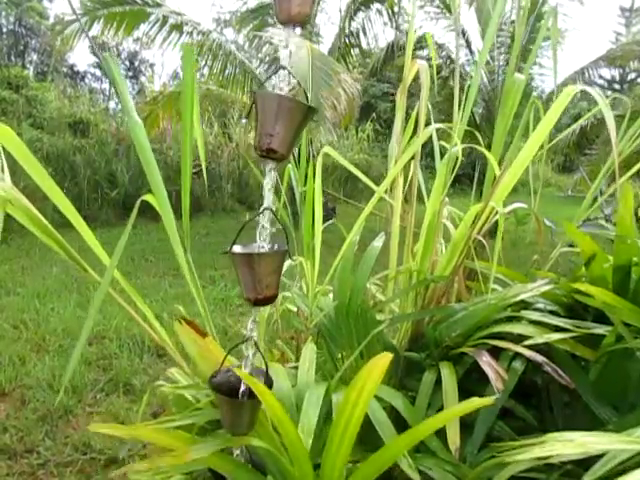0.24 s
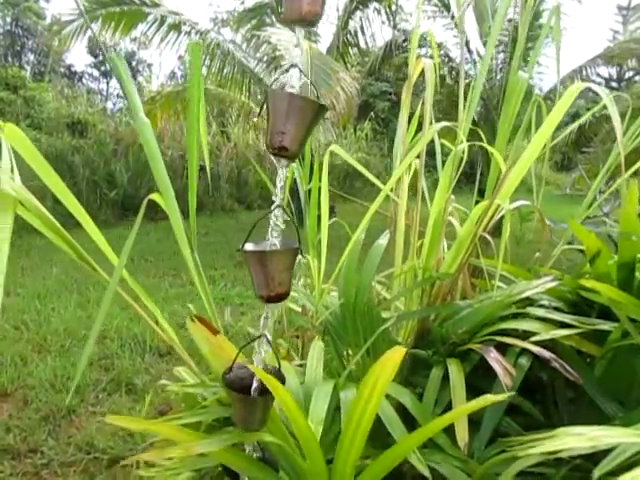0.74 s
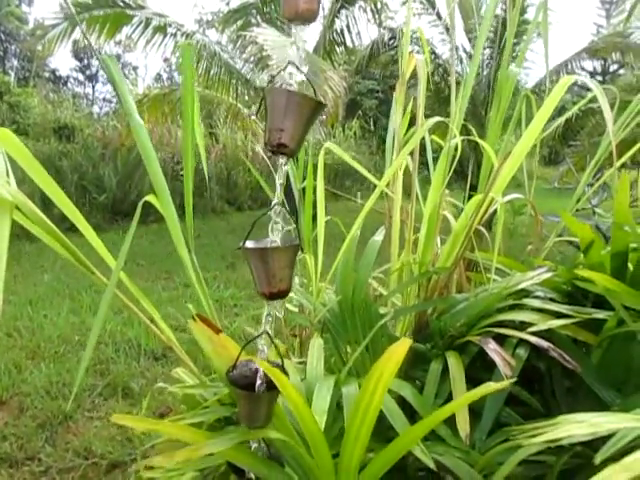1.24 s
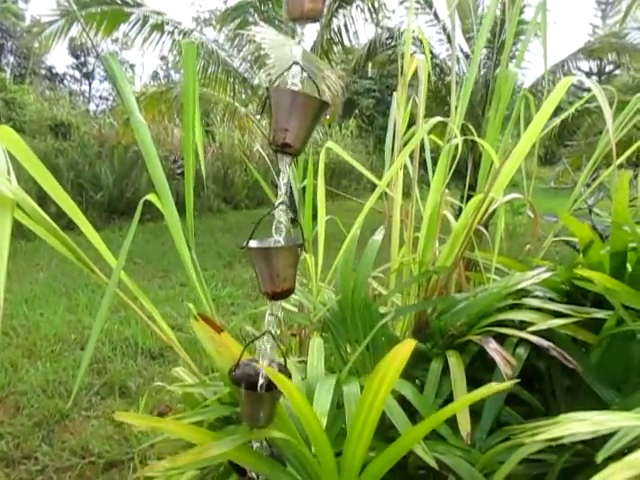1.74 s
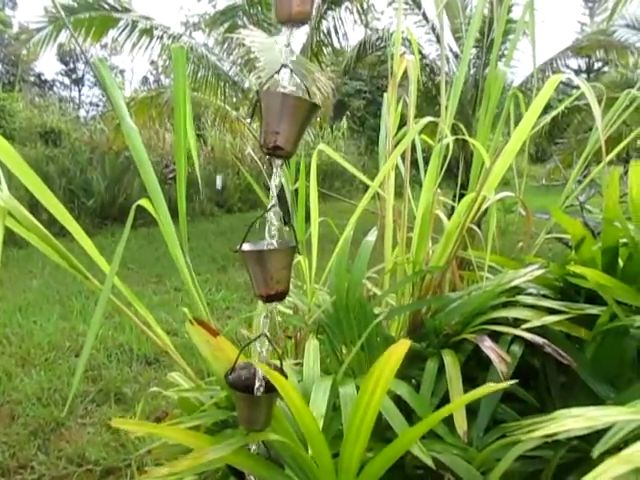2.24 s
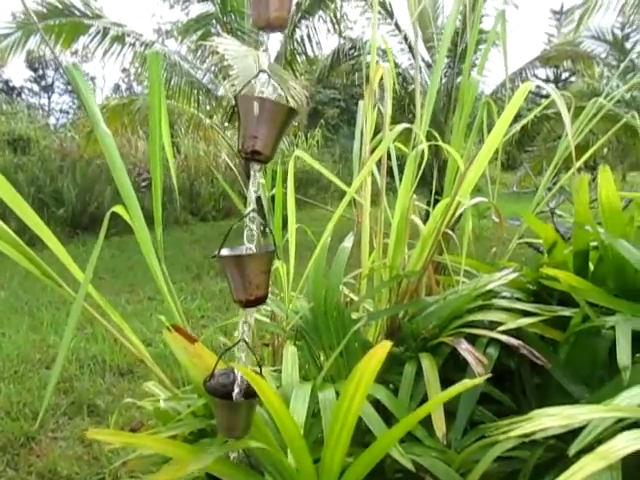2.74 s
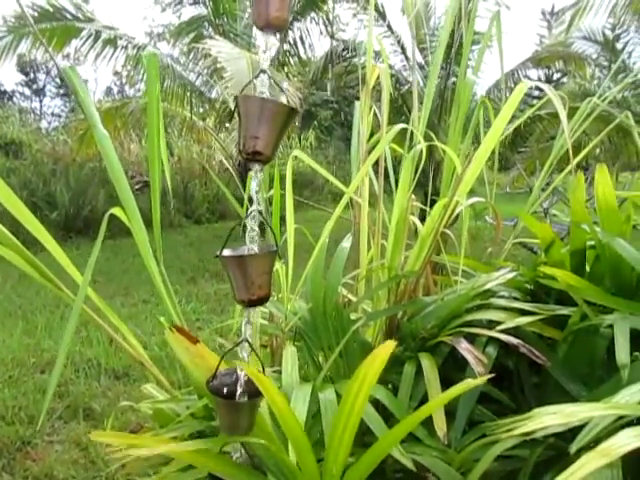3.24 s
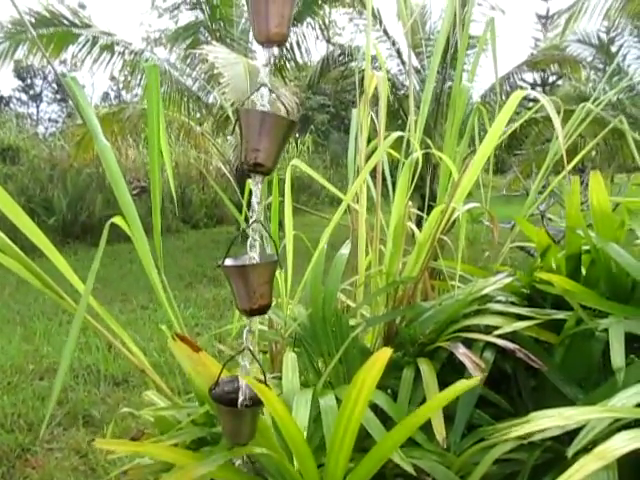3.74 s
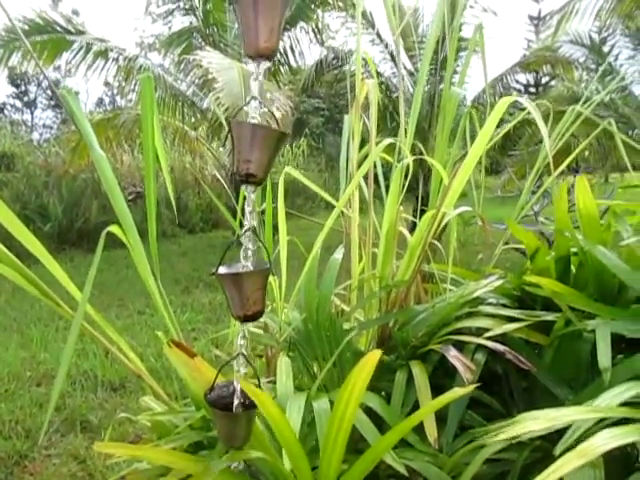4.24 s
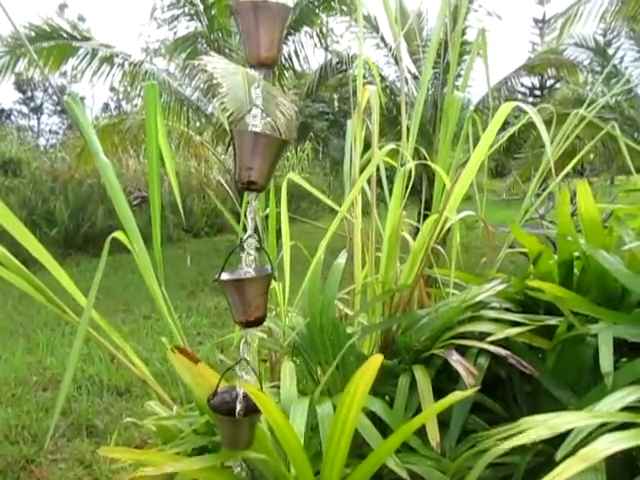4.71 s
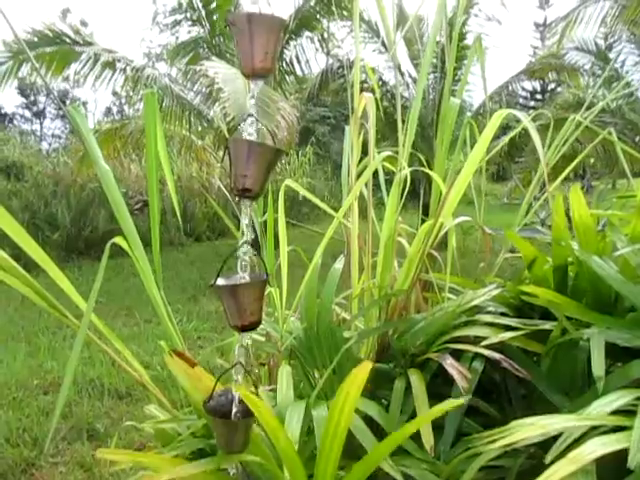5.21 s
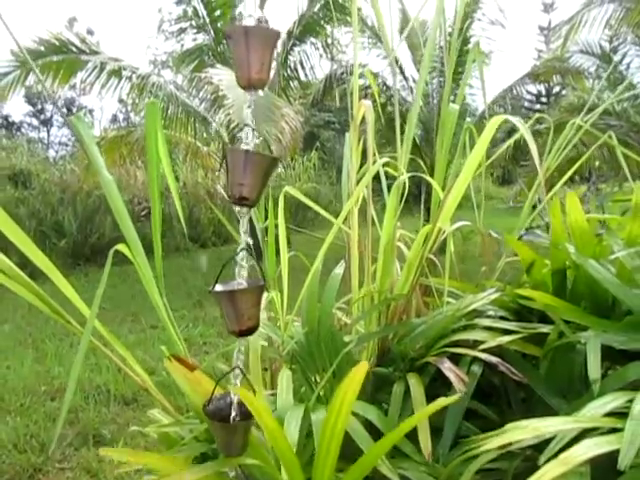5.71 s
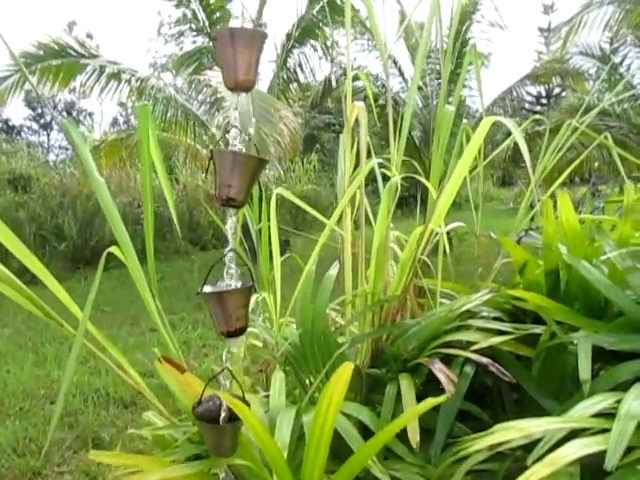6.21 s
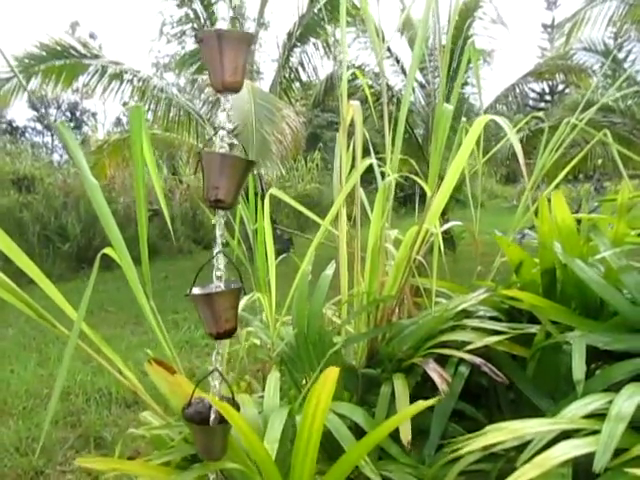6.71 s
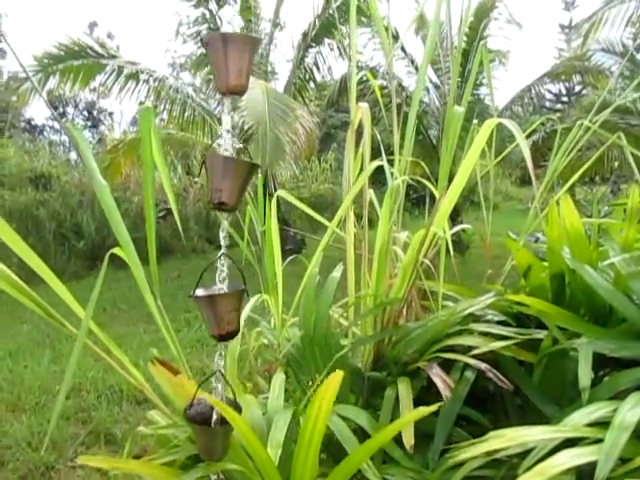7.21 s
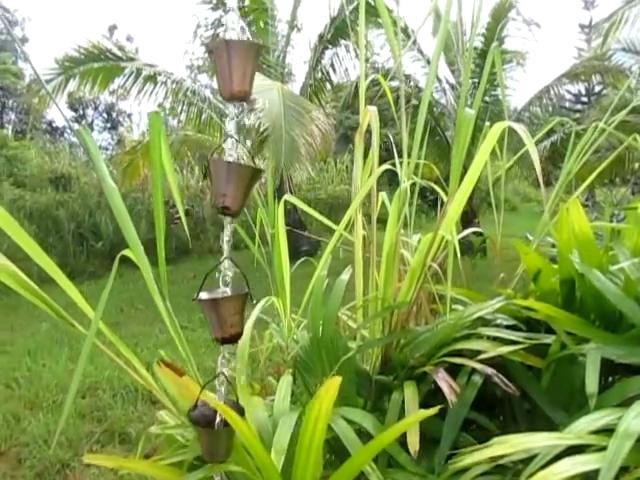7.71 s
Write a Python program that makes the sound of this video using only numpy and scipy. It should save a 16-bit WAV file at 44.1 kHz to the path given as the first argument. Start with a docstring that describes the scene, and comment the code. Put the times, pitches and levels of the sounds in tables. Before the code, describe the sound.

A steady, crisp splatter of falling water, with drops slapping leaves and soil and ticking lightly on thin metal cups outdoors.

```python
"""Water runs down a chain of hanging metal cups in a garden and breaks up on the plants below.
Spray is banded noise that random drops flare up; slugs of water slap on leaves and soil as noise bursts.
Drops tick on the cup walls and set resonators ringing; droplets crackle, trapped bubbles plink as rising sines.
Dull air noise lies behind, with the wavering hum of a distant machine; two microphone ports hear it all."""
import sys
import numpy as np
from scipy import signal
from scipy.fft import rfft, irfft
from scipy.io import wavfile

SR = 44100
rng = np.random.default_rng(int(sys.argv[2]) if len(sys.argv) > 2 else 0)


def file_out(sig):
    """Save sig as 16-bit WAV at sys.argv[1]."""
    # one column per channel
    cols = np.atleast_2d(sig).T
    # limit, then scale
    lim = np.clip(cols, -1, 1)
    pcm = np.round(lim * 32767).astype(np.int16)
    wavfile.write(sys.argv[1], SR, pcm)


N = 351036

# Ringing modes of the cup walls. Each row: nominal pitch in Hz, level in dB, time to fade by 60 dB in seconds.
CUP_MODES = [(5540, -5, 0.036), (8660, -3, 0.04), (10300, -4, 0.025)]
CUP_SPREAD = 0.0078   # detuning from cup to cup, as a share of the pitch


def amp(db):
    """Decibels to a linear factor."""
    return 10 ** (np.asarray(db) / 20)


def rms_one(x):
    """Scale to an overall RMS of 1."""
    return x / np.sqrt(np.mean(x ** 2) + 1e-20)


def peak_one(x):
    """Scale so that the shared part (first row) peaks at 1."""
    return x / abs(x[0]).max()


def at_hz(points, hz):
    """Read a curve joined by straight lines over log frequency."""
    points = np.array(points)
    return np.interp(np.log(hz), np.log(points[:, 0]), points[:, 1])


def in_time(rows):
    """A curve joined by straight lines, one value a sample."""
    return np.interp(np.arange(N) / SR, *np.transpose(rows))


def drift(corner_hz):
    """Slow random wander of RMS 1: noise at every 40th sample through two equal one-pole low-passes."""
    r = np.exp(-80 * np.pi * corner_hz / SR)
    noise = rng.standard_normal(N // 40 + 2002)
    slow = signal.lfilter([1], [1, -2 * r, r * r], noise)[2000:]   # the filter has settled by here
    return np.interp(np.arange(N) / 40, np.arange(len(slow)), rms_one(slow))


def band(x, low_hz, high_hz, order):
    """Butterworth band-pass."""
    return signal.sosfilt(signal.butter(order, [low_hz, high_hz], "band", fs=SR, output="sos"), x)


def ring(clicks, hz, t60):
    """Two-pole resonator: a unit click sets a sine of about height 1 ringing, 60 dB down after t60 seconds."""
    r, w = amp(-60 / (t60 * SR)), 2 * np.pi * hz / SR
    return signal.lfilter([0, np.sin(w)], [1, -2 * r * np.cos(w), r * r], clicks + 1e-18)


def pair(common, apart, hz, extra=0):
    """Left and right from a shared and an opposed part, as alike as that pitch is heard."""
    # Likeness of the two sides. Each row: frequency in Hz, left-right correlation from -1 to 1.
    likeness = [(60, .68), (130, -1), (290, 0.34), (640, 0.58), (1410, 0.6), (3100, 0.49), (6820, -0.074),
                (15000, 0.97)]
    alike = np.clip(at_hz(likeness, hz) + extra, -.95, .98)
    return np.sqrt(1 + alike) * common + np.sqrt(1 - alike) * apart * [[1], [-1]]


def add(out, s, sound):
    """Mix a sound in at s seconds, cut off at the end of the scene."""
    i = round(s * SR)
    out[:, i:i + sound.shape[1]] += sound[:, :N - i]


def spray(low_db, high_db, per_s, spread_db, reach_oct, patter_db, snap_db, t60):
    """Fifth-octave noise; random drops, each covering an octave or so, snap and flare up over a smooth hiss."""
    # Colour of the spray, relative within each half. Each row: frequency in Hz, density in dB per Hz.
    colour = [(88, -38), (150, -15), (309, -5.5), (534, -7.5), (1480, -2.5), (1980, -6.5), (3350, 2),
              (7770, 1.5), (8730, 5), (10600, 3.5), (12500, 3.5), (14200, -9.5), (16000, -1.5)]
    edges = 150 * 2 ** np.arange(0, 7, 1 / 5)
    count = int(per_s * N / SR)
    at = rng.integers(0, N, count)
    size = amp(spread_db * np.minimum(rng.exponential(1, count), 2.4))
    centre = rng.uniform(np.log2(250), np.log2(20000), count)
    reach = reach_oct * amp(2.0 * rng.standard_normal(count))   # some drops are narrower than others
    facing = rng.standard_normal((2, N))   # each snap comes from its own side
    gaps = amp(2 * drift(15))   # the stream breaks up in all bands at once
    white = rng.standard_normal((2, 2, N))
    halves = [0, 0]   # bands centred below and above 3 kHz
    for k, (low, high) in enumerate(zip(edges, edges[1:])):
        hz = np.sqrt(low * high)
        overlap = np.exp(-.5 * ((np.log2(hz) - centre) / reach) ** 2)
        hits = np.bincount(at, size * overlap, N)
        fade = amp(-60 / (SR * (t60 + 6.8 / hz)))   # low drops last longer
        flare = rms_one(signal.lfilter([1], [1, -fade], hits))
        hiss = gaps * amp(2.5 * drift(16.6))
        water = white[k % 2] * (hiss + amp(patter_db) * flare)
        water += amp(snap_db) * rms_one(hits) * facing
        halves[hz > 3000] += amp(at_hz(colour, hz)) * pair(*band(water, low, high, order=2), hz)
    return amp(low_db) * rms_one(halves[0]) + amp(high_db) * rms_one(halves[1])


def crackle(swing_db):
    """Lone droplets snap on leaves: a few milliseconds of fizz, each in one of five colours."""
    per_s, level_db, t60 = 220, -43, 0.0042   # droplets a second in all colours; dB; seconds
    out = 0
    for hz in (1730, 3240, 5070, 8500, 11200):
        size = amp(4.2 * np.minimum(rng.exponential(1, N), 2.5))
        born = (rng.random(N) < per_s / 5 / SR) * size
        fizz = signal.lfilter([1], [1, -amp(-60 / (t60 * SR))], born) * rng.standard_normal((2, N))
        out = out + pair(*band(fizz, hz / 1.38, hz * 1.23, order=1), hz)
    return amp(level_db + swing_db) * out


def plink(hz, cycles, rise):
    """Trapped air rings briefly and climbs in pitch as it nears the surface, where it bursts."""
    burst_ratio = 2.2   # it has fallen silent once its pitch has climbed this far
    turns = hz * np.arange(SR // 30) / SR
    climb = rise * turns / cycles   # the phase gains this share, so the pitch gains twice as much
    fade = amp(-60 * turns / cycles)
    burst = np.clip(8 * (burst_ratio - 1 - 2 * climb), 0, 1)
    return np.sin(2 * np.pi * turns * (1 + climb)) * fade * burst


def bubbles(per_s, level_db, cycles, rise):
    """Many faint short bubbles at random, a few clear ones, all sines of trapped air."""
    # Single drops that trap a bubble. Each row: start in seconds, level in dB, start pitch in Hz,
    # cycles to fade by 60 dB, half the rise in pitch over those cycles as a share of the start pitch.
    clear_ones = [(0.557, -35.5, 2130, 423, 8.7), (3.166, -29.5, 4580, 58, .15),
                  (3.196, -29.5, 1240, 12, 0.54), (4.605, -36.5, 3100, 71, 0.23),
                  (4.651, -34, 3030, 127, 0.22), (4.687, -34, 3700, 77, .2), (5.215, -34, 2170, 51, 0.045),
                  (7.238, -25.5, 4100, 27.5, 0.1), (7.469, -33.5, 3600, 95, 0.55)]
    out = np.zeros((2, N))
    for when, pitch, loud, side in rng.random((int(per_s * N / SR), 4)):
        sides = amp([[3.2 * (side - .5)], [5.6 * (.5 - side)]])
        level = amp(level_db - 23.3 * np.sqrt(loud))
        add(out, when * N / SR, level * sides * plink(800 * 2 ** (3.8 * pitch), cycles, rise))
    for s, db, hz, turns, climb in clear_ones:
        add(out, s, amp(db) * plink(hz, turns, climb) * [[1], [1]])
    return out


def pings(per_s, level_db):
    """Stray droplets ring one wall mode or another, on cups tuned slightly apart; per_s counts for each."""
    out = 0
    for hz, db, t60 in CUP_MODES:
        for tune in (-1, 0, 1):
            struck = (rng.random(N) < per_s / SR) * rng.standard_normal((2, N))
            out = out + amp(db + level_db) * pair(*ring(struck, hz * (1 + CUP_SPREAD * tune), t60), hz)
    return out


def garden():
    """Dull outdoor air as shaped noise, unrelated left and right, and a wavering sine hum from far off."""
    # Colour of the open air, relative. Each row: frequency in Hz, density in dB per Hz.
    air_colour = [(20, -27), (40, -12), (65, 1), (124, -2), (193, -4), (311, -2.5), (400, -7.5), (880, -99)]
    # Loudness of the distant machine, before its waver. Each row: time in seconds, peak level in dB.
    hum_level = [(0, -60.5), (1, -61.5), (4.2, -62), (5.5, -59), (6.3, -59.5), (7, -61.5), (7.96, -62)]
    air_db, hum_hz, hum_wander_hz = -62, 47.6, 0.9
    hz = np.fft.rfftfreq(N, 1 / SR) + 1
    air = rms_one(irfft(rfft(rng.standard_normal((2, N))) * amp(at_hz(air_colour, hz)), N))
    phase = 2 * np.pi * np.cumsum(hum_hz + hum_wander_hz * drift(0.41)) / SR
    hum = amp(in_time(hum_level) + 2.5 * drift(4.1)) * np.sin(phase)
    return amp(air_db) * air + hum


def droplets(t60, crack, rough_db):
    """A sharp crack and a quick first burst, then a dying cluster of uneven droplets; shared and opposed part."""
    t = np.arange(SR // 12) / SR
    clumps = np.repeat(rng.standard_normal(len(t) // 40 + 1), 40)[:len(t)]   # about a millisecond each
    fall = amp(-60 * t / t60) + 1.2 * np.exp(-t / 0.00071)
    x = rng.standard_normal((2, len(t))) * amp(rough_db * clumps) * fall
    x[0, :3] += crack * np.array([1, 1, -1])
    return x


def slaps(width_oct, thud_db, fizz_db):
    """A slug on a leaf or soil: noise around its centre, a low thud, a bright fizz and a few bubbles after."""
    # Slugs of water landing. Each row: start in seconds, level of the body in dB, centre in Hz.
    landings = [(0.049, -31, 3000), (0.088, -27, 3600), (0.250, -33, 1020), (0.376, -31.5, 1650),
                (0.496, -24.5, 4500), (0.549, -34, 3120), (0.650, -16.5, 2760), (0.670, -21, 4400),
                (0.682, -29, 3580), (0.844, -28.5, 4050), (0.967, -27, 3010), (1.055, -44, 3670),
                (1.286, -26, 4300), (1.303, -35, 1500), (1.349, -30, 4000), (1.354, -26, 3700),
                (1.376, -30.5, 1900), (1.451, -26.5, 2660), (1.47, -28, 2500), (1.576, -40, 1480),
                (1.578, -23, 6100), (1.773, -31.5, 3050), (1.826, -25.5, 1070), (1.84, -25.5, 3980),
                (1.849, -29.5, 2500), (1.961, -43, 3320), (2.045, -32.5, 1760), (2.115, -35, 1240),
                (2.324, -31, 2050), (2.558, -34, 3290), (2.628, -29, 4000), (2.644, -35, 3340),
                (2.731, -31, 5100), (2.922, -26, 2110), (2.989, -30, 1570), (3, -37, 940),
                (3.042, -30, 1300), (3.056, -25, 2560), (3.124, -32, 4440), (3.15, -30, 4740),
                (3.416, -27, 2730), (3.446, -32, 3010), (3.476, -24, 2400), (3.505, -32, 3500),
                (3.578, -30, 3070), (3.725, -33, 3430), (3.761, -34, 3420), (3.952, -29.5, 1600),
                (4.000, -32, 3030), (4.05, -28.5, 2160), (4.128, -25.5, 3870), (4.179, -33.5, 1430),
                (4.189, -26.5, 1720), (4.323, -33, 1510), (4.33, -34, 1100), (4.411, -31.5, 1810),
                (4.454, -33, 3780), (4.707, -25, 4450), (4.871, -29, 3840), (5.004, -34.5, 1150),
                (5.0725, -28.5, 3780), (5.123, -29, 4350), (5.225, -29.5, 1930), (5.234, -43, 810),
                (5.392, -34.5, 1530), (5.448, -26, 1400), (5.472, -30.5, 1700), (5.501, -30, 2720),
                (5.531, -29, 1790), (5.585, -34, 970), (5.658, -25.5, 3480), (5.771, -34, 4400),
                (5.788, -24.5, 2760), (5.866, -27, 3300), (6.234, -31, 2980), (6.282, -28.5, 1590),
                (6.304, -31, 2820), (6.393, -36, 1790), (6.549, -36, 3320), (6.566, -26.5, 3380),
                (6.597, -34, 1470), (6.645, -26, 1570), (6.664, -22.5, 4170), (6.987, -28, 2190),
                (7.161, -34, 1500), (7.237, -33, 4800), (7.402, -36.5, 1100), (7.531, -32, 1530),
                (7.578, -34, 3470), (7.633, -41, 3240), (7.694, -34, 2460), (7.72, -24.5, 2930),
                (7.73, -28, 5330), (7.762, -34, 2450), (7.772, -31, 2560), (7.804, -33, 1500)]
    fizz_db_per_oct = -4   # counted from 3 kHz: deep slugs fizz more against this slope than bright ones
    froth_s, froth_oct, froth_cycles = 0.014, 1.1, 18   # born within; pitch scatter either way; 60 dB fade
    out = np.zeros((2, N))
    for s, db, hz in landings:
        wet = droplets(t60=0.05, crack=3.56, rough_db=3.5)
        body = peak_one(band(wet, hz * 2 ** -width_oct, hz * 2 ** width_oct, order=1))
        body += amp(thud_db) * peak_one(band(wet, 330, 1950, order=1))
        bright_db = fizz_db + fizz_db_per_oct * np.log2(hz / 3000)
        body += amp(bright_db) * peak_one(band(wet, 4000, 19845, order=1))
        add(out, s, amp(db) * pair(*body, hz, extra=0.33))
        for late, pitch in rng.random((3, 2)):
            froth = plink(hz * 2 ** (froth_oct * (2 * pitch - 1)), froth_cycles, 0.18)
            froth_db = db - 8 * (1.5 + late)   # later bubbles are fainter
            add(out, s + froth_s * late, amp(froth_db) * froth * [[1], [1]])
    return out


def ticks(width_oct, skirt_db):
    """A drop on metal: its first moments ring the wall modes near its colour; no two cups are tuned alike."""
    # Drops striking a cup wall. Each row: start in seconds, level of the splash in dB, centre in Hz,
    # ringing against the splash in dB, ahead of each mode's own level and its nearness in pitch.
    strikes = [(0.057, -28.5, 9550, -6), (0.113, -26, 8900, -13), (0.2334, -44, 5580, 9),
               (0.317, -22, 8350, 0), (0.466, -46, 12800, -45), (0.671, -27.5, 8850, -3),
               (0.735, -33.5, 6700, -30), (0.9637, -31.5, 9100, -57), (1.0215, -24, 9050, -15),
               (1.2856, -33, 9280, -45), (1.32, -31, 8900, -6), (1.418, -42, 9000, -16),
               (1.432, -23.5, 10900, -11), (1.595, -26, 12500, -6), (1.608, -33, 9500, -3),
               (1.8243, -33, 5800, 1), (2.225, -27.5, 8850, -3), (2.356, -43, 5440, -10),
               (2.369, -30, 9600, -3), (2.407, -33, 11000, -10), (2.5938, -33.5, 7340, -2),
               (2.627, -27, 8650, -6), (2.6588, -24.5, 8700, -8), (2.699, -30, 9930, 0),
               (2.9256, -29, 11400, -37), (2.9308, -37, 5540, 2), (3.28, -36, 5450, 0),
               (3.417, -27.5, 9040, -15), (3.458, -25.5, 8590, -27), (3.759, -32, 9900, -8),
               (4.13, -22.5, 10800, -7), (4.2418, -22, 10400, -16), (4.2638, -29.5, 5700, 0),
               (4.3097, -26.5, 10200, -29), (4.4463, -51, 5450, -24), (4.579, -26, 9200, -4),
               (4.7055, -29, 8750, -11), (5.022, -28, 8800, -23), (5.027, -36, 5600, 0),
               (5.0733, -34, 7660, -37), (5.5735, -21.5, 9600, -28), (5.7702, -35, 7420, -11),
               (5.788, -28.5, 9000, -10), (5.866, -31, 9400, -15), (6.002, -36, 11500, -53),
               (6.205, -28.5, 9100, -17), (6.53, -32.5, 8050, 6), (6.666, -18, 10300, -13),
               (6.784, -38, 10700, -64), (6.8837, -31.5, 8600, -5), (6.959, -33.5, 10300, -10),
               (6.981, -30, 10100, -13), (7.092, -32.5, 9600, -31), (7.224, -32, 5800, -3.5),
               (7.722, -33, 8750, -25), (7.7693, -29, 11100, -2.5)]
    strike_s, reach_oct = 0.00373, 0.68   # part of a tick that drives the wall; how far in pitch it reaches
    blip_cycles, blip_db = 49, -9.5   # the first touch is a short clear blip at the drop's own pitch
    out = np.zeros((2, N))
    for s, db, hz, ring_db in strikes:
        wet = droplets(t60=0.036, crack=3.5, rough_db=2.5)
        n = np.arange(wet.shape[1])
        touch = wet * (n < strike_s * SR / 4)
        strike = wet * (n < strike_s * SR)
        body = peak_one(band(wet, hz * 2 ** -width_oct, hz * 2 ** width_oct, order=1))
        body += amp(blip_db) * peak_one(ring(touch, hz, blip_cycles / hz))
        body += amp(skirt_db) * peak_one(band(wet, 930, 15000, order=2))
        for (mode_hz, level_db, ring_t60), tune in zip(CUP_MODES, rng.standard_normal(len(CUP_MODES))):
            near = np.exp(-.5 * (np.log2(hz / mode_hz) / reach_oct) ** 2)
            wall = peak_one(ring(strike, mode_hz * (1 + CUP_SPREAD * tune), ring_t60))
            body += near * amp(level_db + ring_db) * wall
        add(out, s, amp(db) * pair(*body, hz, extra=0.1))
    return out


def scene():
    """All the water around the chain, its spray and crackle following the flow, with the garden behind."""
    # The stream swells and thins. Each row: time in seconds, level of the spray above 3 kHz in dB.
    flow = [(0.0, -42), (0.55, -40), (1.24, -43), (1.44, -40), (1.6, -43), (1.97, -41.5), (2.81, -42),
            (3.06, -40.5), (3.86, -44), (4.34, -39), (4.61, -42), (5.72, -41.5), (5.96, -43), (6.23, -42.5),
            (6.89, -44), (7.05, -41.5), (7.43, -45.5), (7.69, -41.5), (7.96, -42)]
    flow_db = in_time(flow)
    swing_db = flow_db - flow_db.mean()
    splash_db = -53 + 0.9 * swing_db   # low splashing below 3 kHz shares most of the swing
    fine = spray(splash_db, flow_db, per_s=550, spread_db=4.5, reach_oct=0.48,
                 patter_db=1.5, snap_db=-0.5, t60=0.015)
    trapped = bubbles(per_s=260, level_db=-38, cycles=22, rise=.3)
    metal = pings(per_s=6.0, level_db=-43)
    hits = slaps(width_oct=0.96, thud_db=-12, fizz_db=-8) + ticks(width_oct=0.051, skirt_db=-12)
    return fine + crackle(swing_db) + trapped + metal + garden() + hits


def record(dry):
    """Two microphone ports with unequal colour and phase, a narrow housing notch, then the top is cut."""
    # Unequal colour of the ports. Each row: frequency in Hz, left minus right in dB.
    port_tilt = [(60, 1.5), (130, -1.5), (290, -0.5), (640, 0.5), (1410, 0), (3100, -4), (6820, 2.5),
                 (15000, 2)]
    # Phase between the ports. Each row: frequency in Hz, lead of the left in radians.
    port_lead = [(200, 0.042), (2500, 0.13), (5080, 0.7), (5600, 2.06), (8610, 0.68), (13900, 1.65)]
    notch_hz, notch_width_hz, stop_hz = 7870, 260, 16300   # 70 dB down from stop_hz up
    hz = np.fft.rfftfreq(N, 1 / SR) + 1
    tilt = amp(at_hz(port_tilt, hz) / 2)
    ports = irfft(rfft(dry) * [tilt, np.exp(-1j * at_hz(port_lead, hz)) / tilt], N)
    notched = signal.lfilter(*signal.iirnotch(notch_hz, notch_hz / notch_width_hz, SR), ports)
    notched += .12 * ports   # keeps the notch from being bottomless
    return signal.sosfilt(signal.cheby2(16, 70, stop_hz, fs=SR, output="sos"), notched)


dry = scene()
out = record(dry)
file_out(out)
```